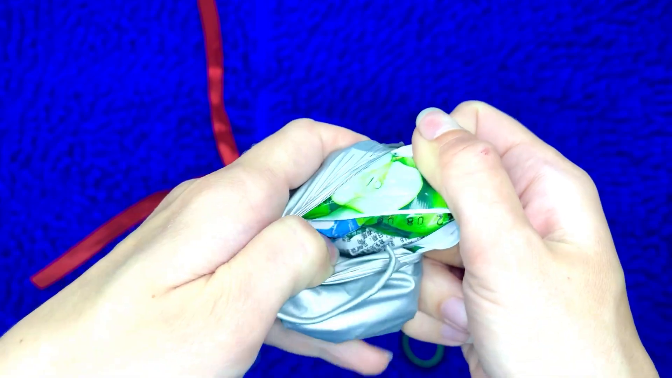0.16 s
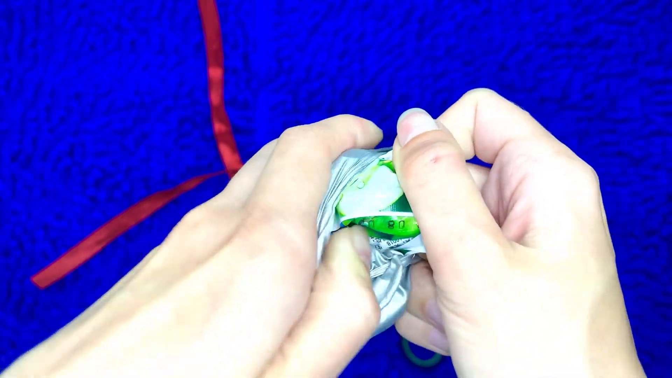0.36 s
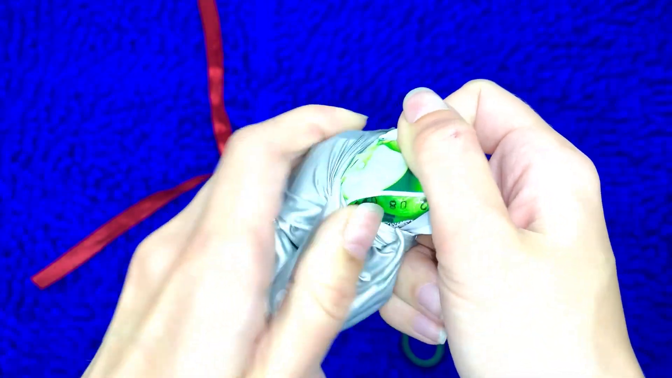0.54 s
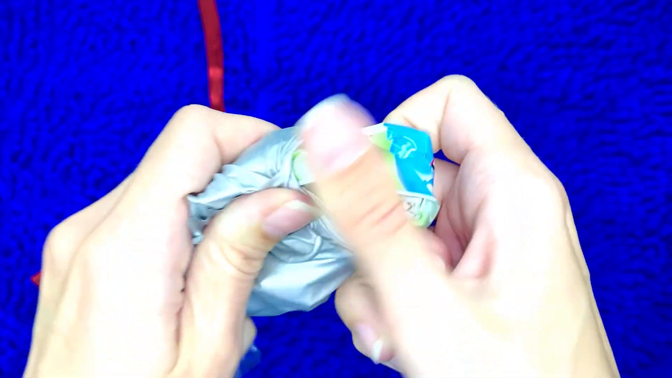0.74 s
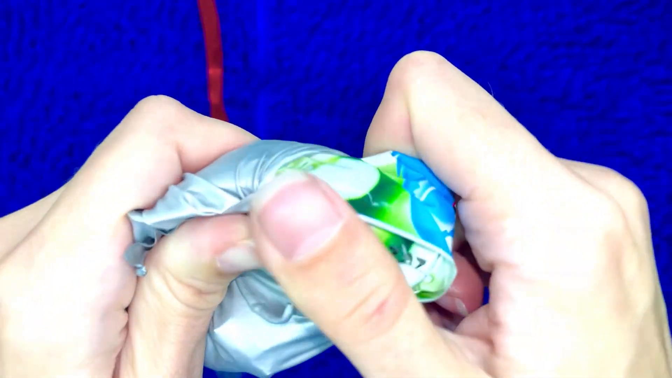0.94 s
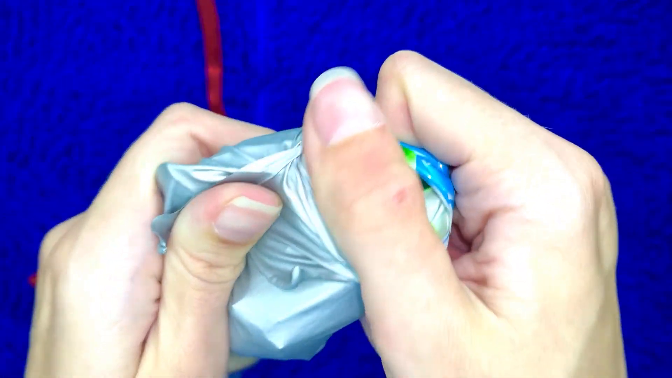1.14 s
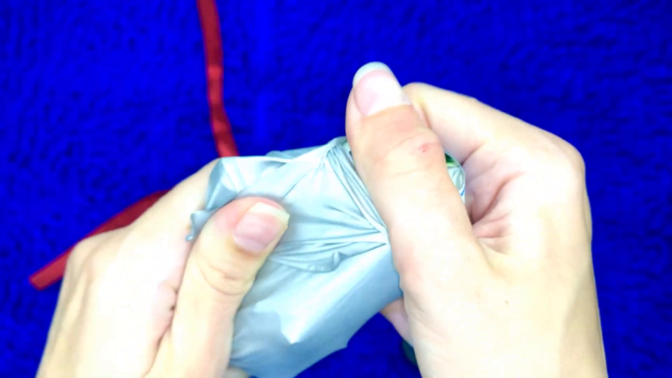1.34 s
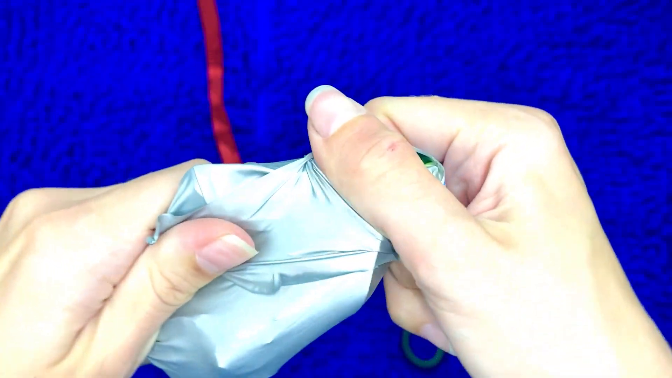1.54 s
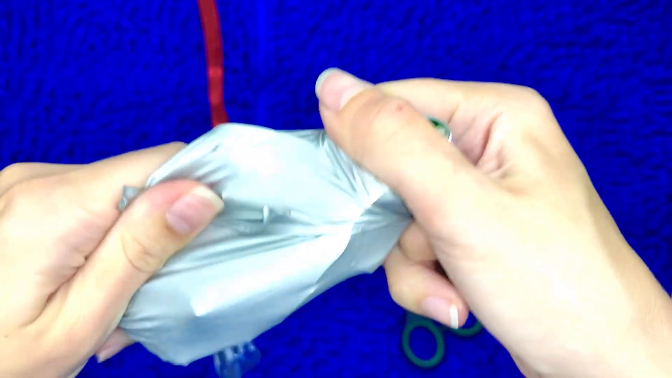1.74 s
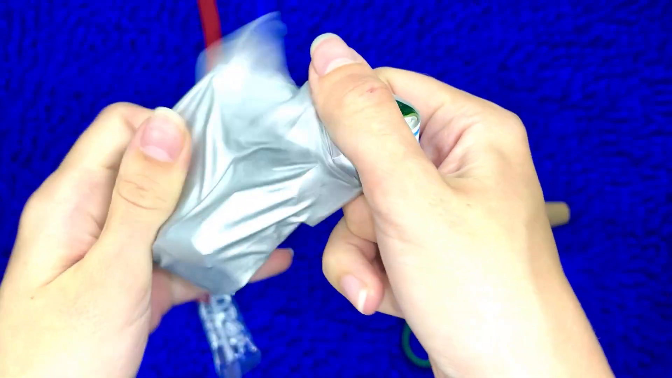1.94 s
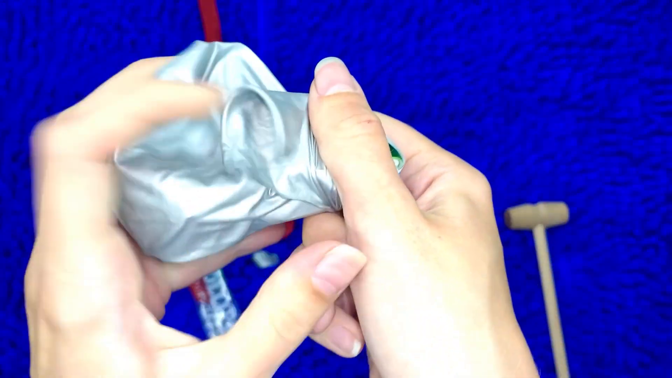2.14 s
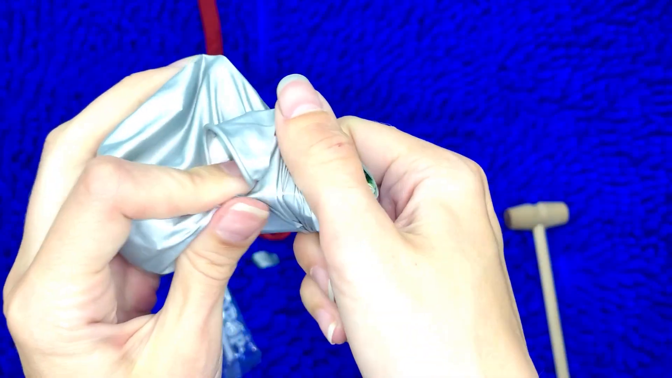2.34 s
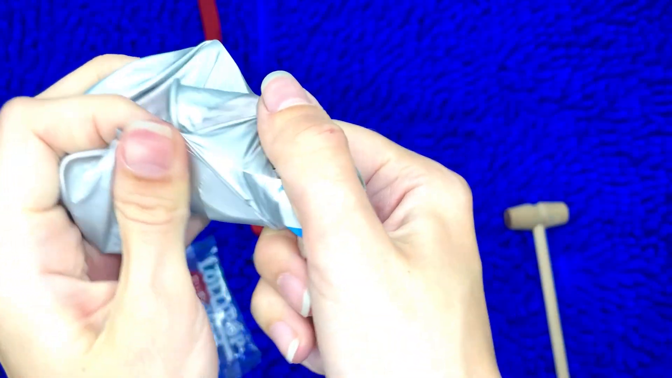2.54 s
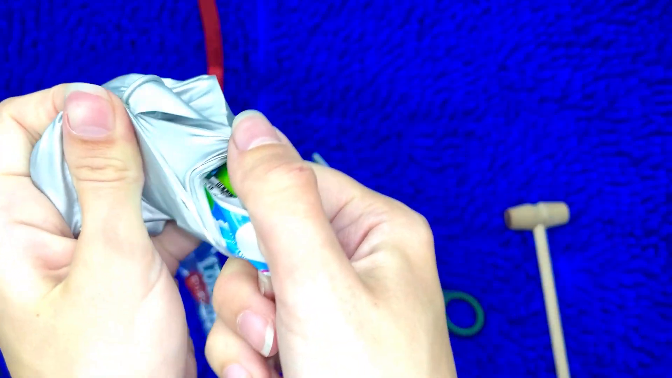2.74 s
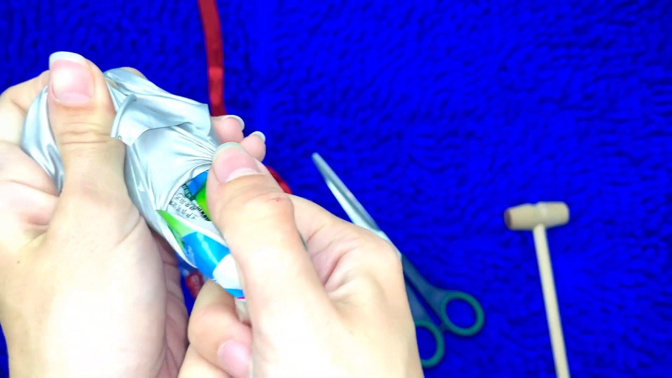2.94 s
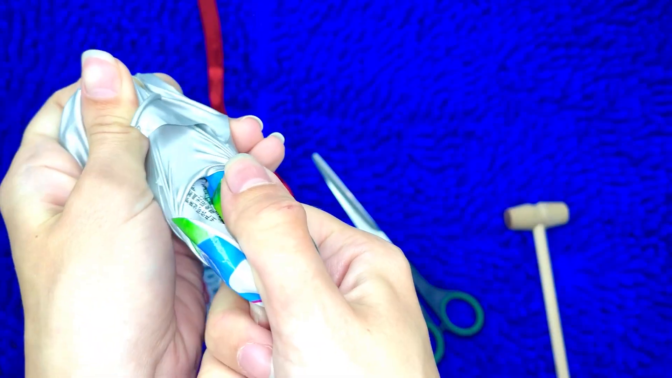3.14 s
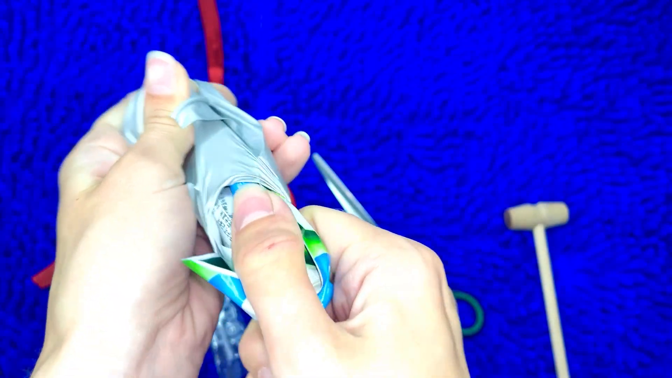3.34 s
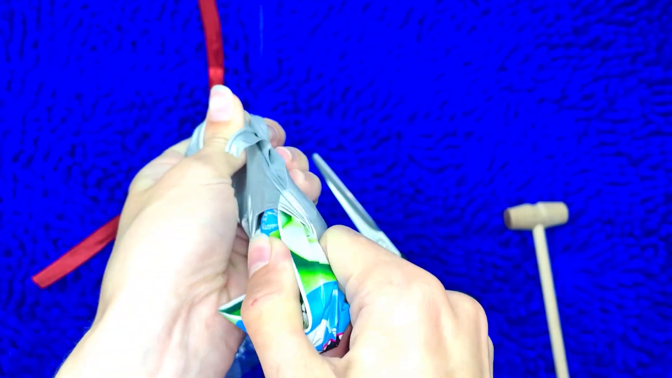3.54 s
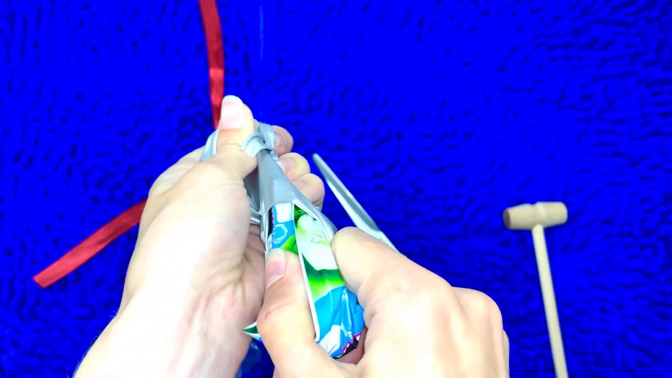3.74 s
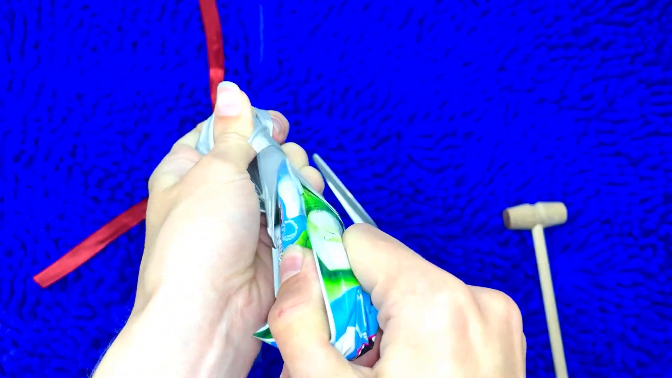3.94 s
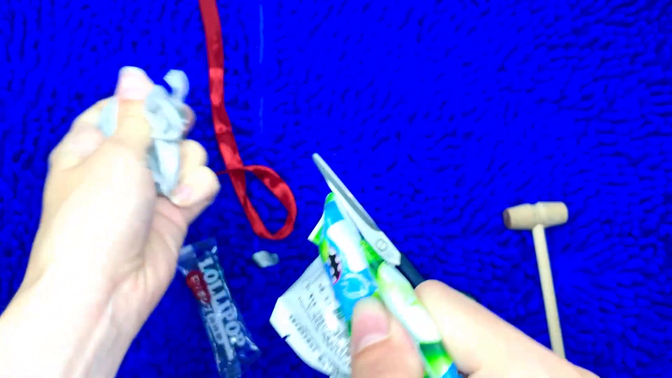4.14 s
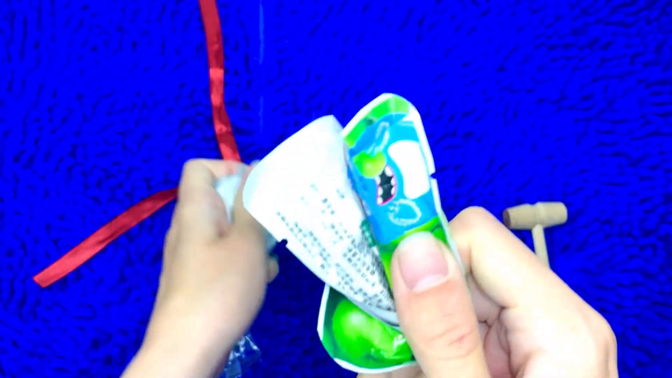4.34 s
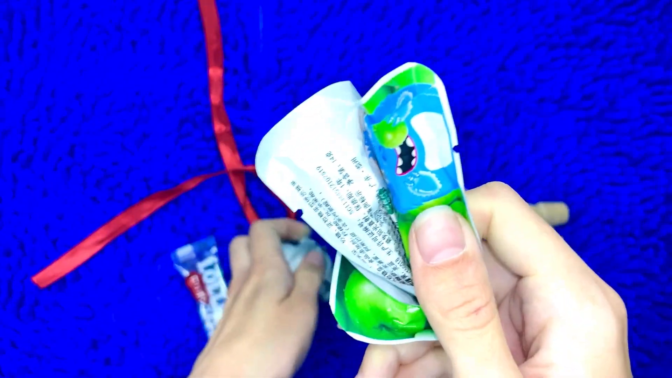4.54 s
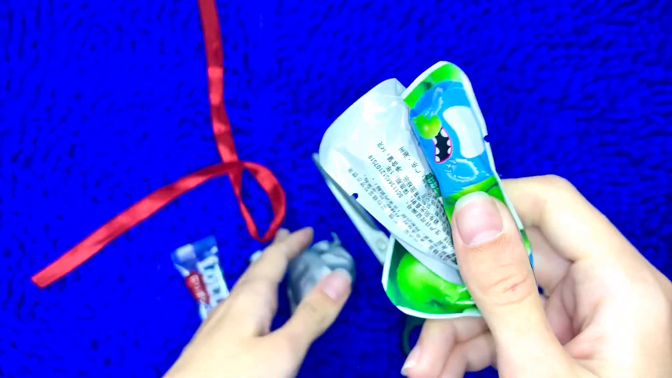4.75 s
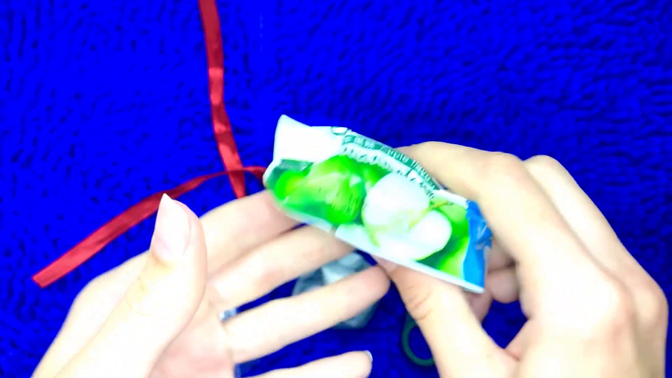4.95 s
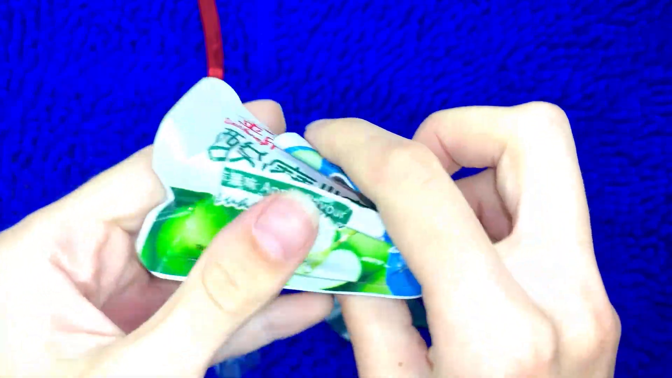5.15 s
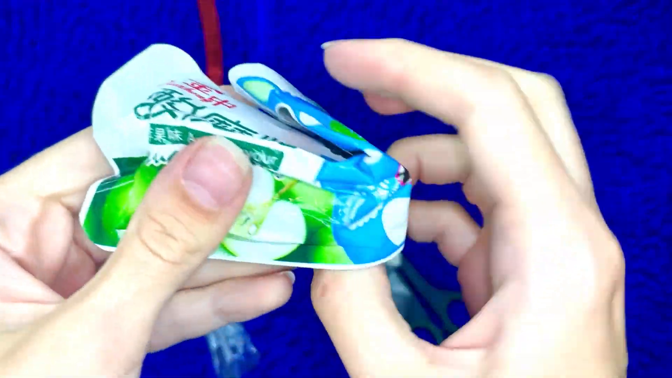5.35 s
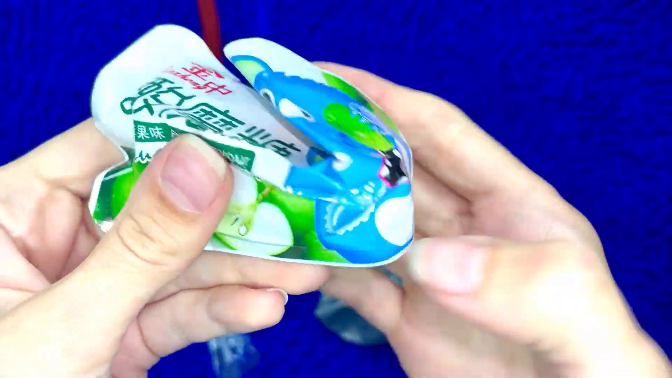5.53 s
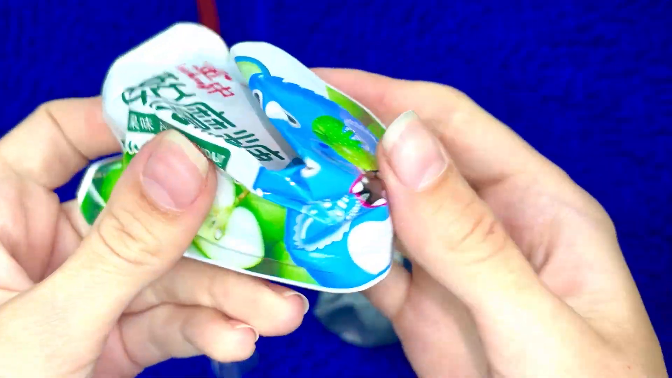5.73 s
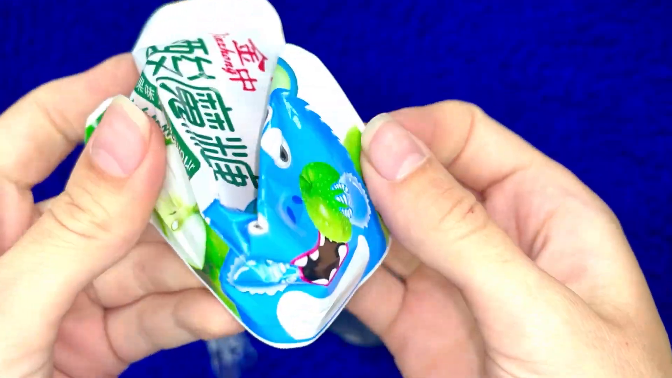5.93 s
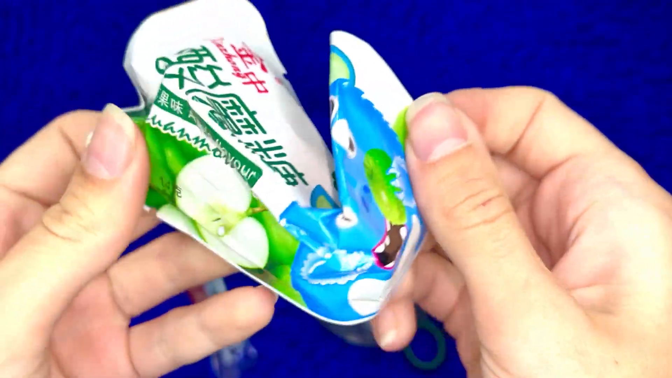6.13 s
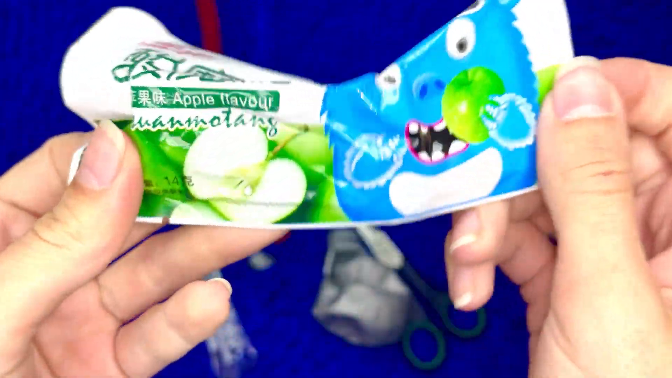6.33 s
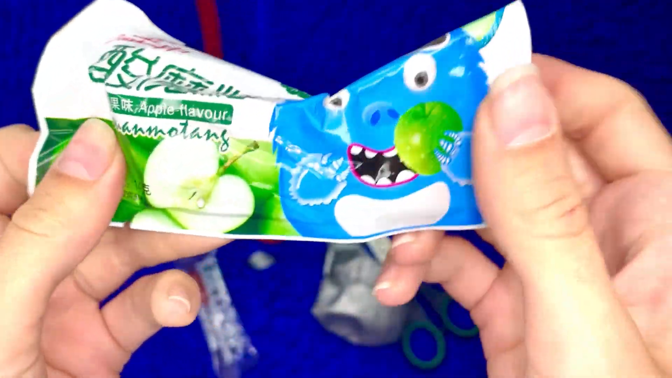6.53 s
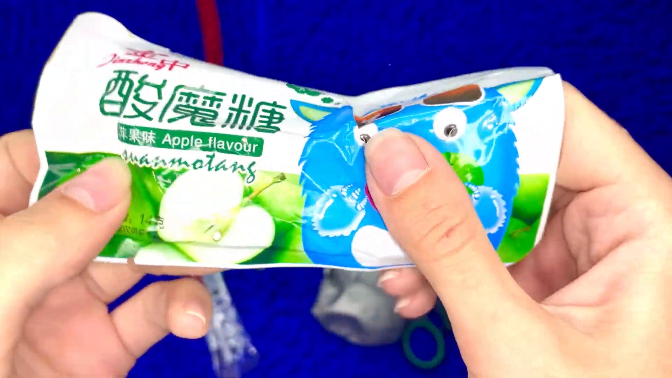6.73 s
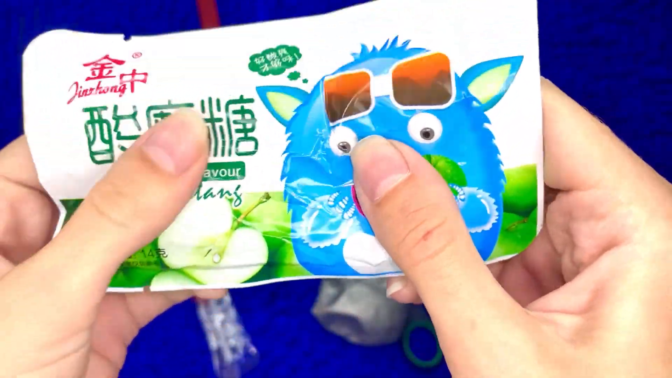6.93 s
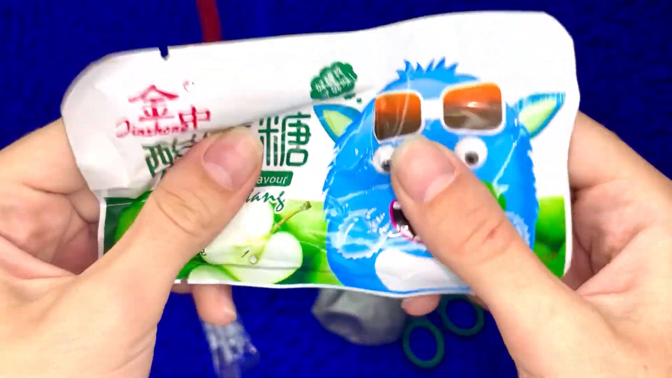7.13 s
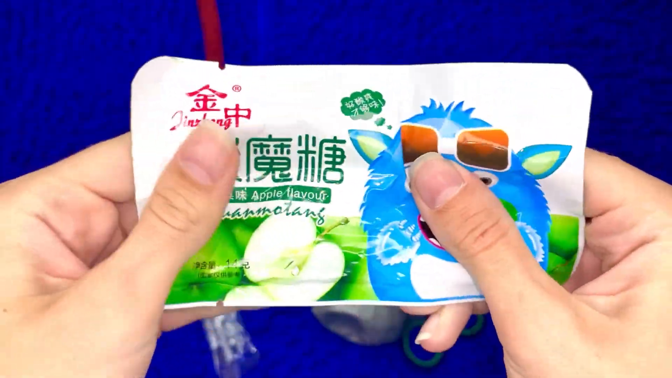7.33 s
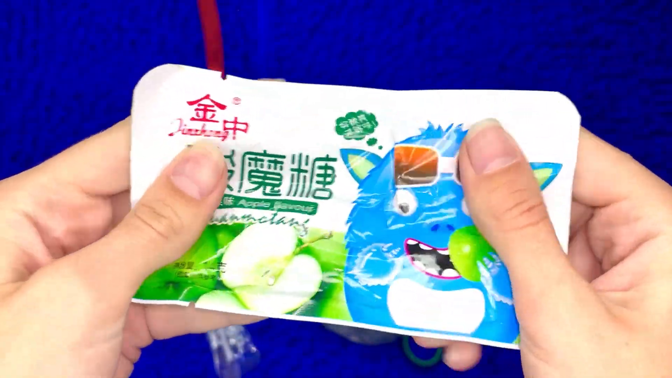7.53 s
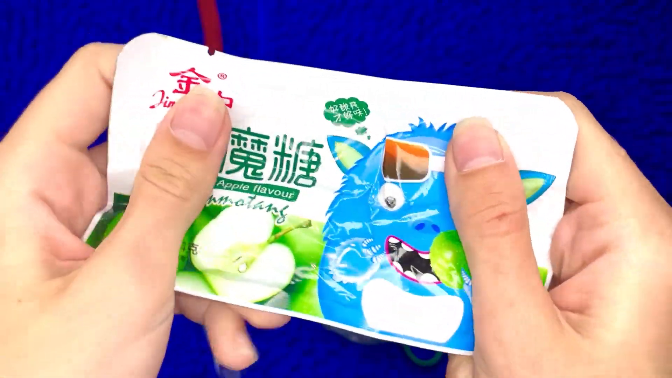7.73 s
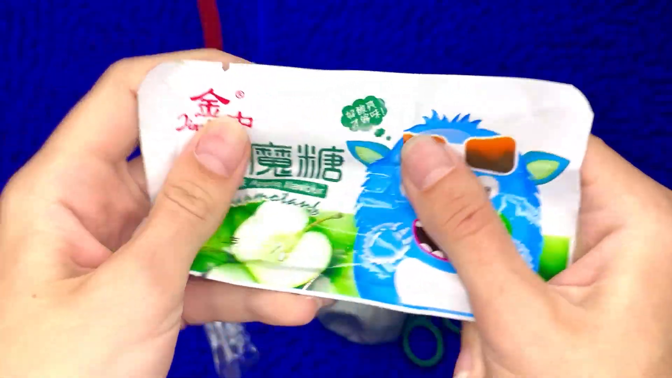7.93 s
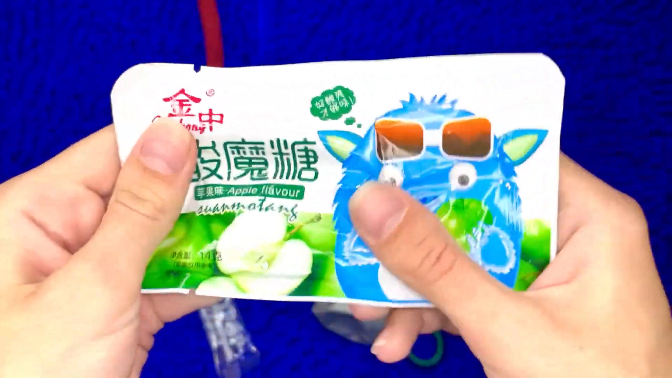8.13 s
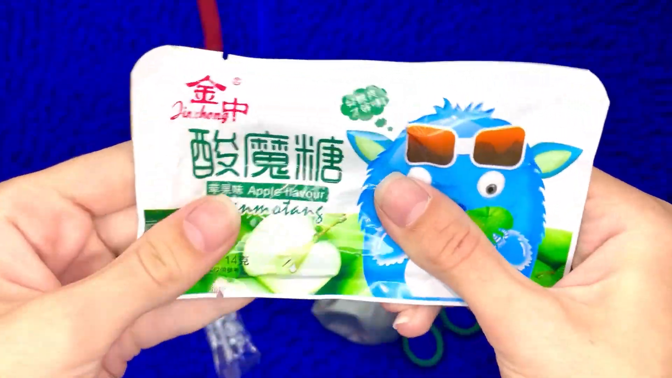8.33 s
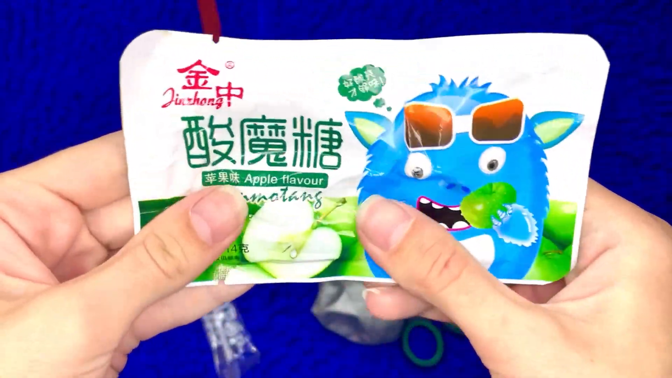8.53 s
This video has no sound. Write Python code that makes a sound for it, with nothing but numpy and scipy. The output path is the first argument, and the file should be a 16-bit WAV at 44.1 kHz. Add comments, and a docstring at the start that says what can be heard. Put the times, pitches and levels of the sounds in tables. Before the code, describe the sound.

Close, crisp wrapper crinkling: soft rustles and separate snaps, a brief lull, then busy bright crackling over a faint low motor hum.

```python
"""Foil wrap and sweet pouch, close up

Hands knead, pull apart and smooth out a foil wrap and a plastic pouch close to a two-port microphone.
Creases buckle as short noise snaps that spread through the film, highs first; small ticks and a skin rub
fill the gaps, and the pouch puffs low air. A quiet room adds steady air noise, a dull tail of echoes and
two standing waves; a motor hums faintly as two wavering tones."""
import sys
import numpy as np
from scipy import signal
from scipy.fft import rfft, irfft, next_fast_len
from scipy.io import wavfile
from scipy.ndimage import uniform_filter1d

SR = 44100
rng = np.random.default_rng(int(sys.argv[2]) if len(sys.argv) > 2 else 0)


def store_wav(level_fs):
    """Save 16-bit WAV to argv[1]."""
    pcm = np.round(np.clip(np.atleast_2d(level_fs), -1, 1) * 32767)
    wavfile.write(sys.argv[1], SR, pcm.T.astype(np.int16))


N = 382788


def from_db(db):
    """Gain of a dB value."""
    return 10 ** (np.asarray(db) / 20)


def rms_one(x, axis=None):
    """Scale to rms 1."""
    return x / np.sqrt(np.mean(x ** 2, axis=axis, keepdims=True) + 1e-20)


def at_hz(points, hz):
    """Read the second column of a table on a log-frequency axis."""
    table_hz, values = np.array(points).T
    return np.interp(np.log(hz), np.log(table_hz), values)


def drift(rate_hz):
    """Slow random wander of rms 1: noise through two equal low-pass poles, worked at every 40th sample."""
    pole = np.exp(-2 * np.pi * rate_hz * 40 / SR)
    noise = rng.standard_normal(N // 40 + 2002)
    slow = signal.lfilter([1], [1, -2 * pole, pole ** 2], noise)[2000:]   # skip the filter's start
    return np.interp(np.arange(N) / 40, np.arange(len(slow)), rms_one(slow))


# how alike the sound is at the two microphone ports: f/Hz, likeness/0-1
PORT_LIKENESS = [(100, .996), (700, .9), (1400, .99), (3300, .75), (5500, .95)]


def paired(mid, side, hz):
    """Two ports from a shared and an opposed part, as alike as the table says."""
    alike = np.clip(at_hz(PORT_LIKENESS, hz), 0, 1)
    shared = np.sqrt(1 + alike) * mid
    opposed = np.sqrt(1 - alike) * side
    return np.array([shared + opposed, shared - opposed])


def coloured(spectrum, size):
    """Steady two-port noise of a given colour; rms 1."""
    hz = np.maximum(np.fft.rfftfreq(size, 1 / SR), 1)
    mid, side = rfft(rng.standard_normal((2, size)))
    return rms_one(irfft(paired(mid, side, hz) * from_db(at_hz(spectrum, hz)), size))


# colour of the quiet room's air, relative: f/Hz, level/dB per Hz
AIR_COLOUR = [(20, -28), (60, -4), (125, 7.5), (230, -9), (600, -20.5), (6000, -19), (16000, -35)]


def room_air():
    """The quiet place itself: steady low-weighted noise at -58 dB rms."""
    return from_db(-58) * coloured(AIR_COLOUR, size=N)


# deep motor tone, mean rms level before its wander: t/s, level/dB
DEEP_TONE = [(0.6, -70), (2.8, -53), (3.8, -63.5), (4.6, -52), (5.8, -65)]
DEEP_HZ, HUM_HZ, HUM_PEAK_DB = 49, 162.9, -50


def motor_hum():
    """Two motor tones wavering in pitch and level: a steady one and a deep one that swells."""
    t = np.arange(N) / SR
    deep_rms_db = np.interp(t, *np.transpose(DEEP_TONE)) + 3.0 * drift(2.5)
    deep_phase = 2 * np.pi * np.cumsum(DEEP_HZ + 0.93 * drift(5.5)) / SR
    deep = from_db(deep_rms_db + 3) * np.sin(deep_phase)   # a sine peaks 3 dB above its rms
    hum_phase = 2 * np.pi * np.cumsum(HUM_HZ + 0.78 * drift(1.47)) / SR
    return deep + from_db(HUM_PEAK_DB + 2.0 * drift(4.7)) * np.sin(hum_phase)


# standing waves of the room, level against the start of the echoes: f/Hz, level/dB, t60/s
STANDING_WAVES = [(120.8, -7, 0.63), (393.4, -10, 0.69)]
ROOM_T60_S, ROOM_DB = 0.26, -18


def room(x):
    """A dull tail of dense echoes and two standing waves that ring on."""
    t = np.arange(SR // 2) / SR
    echoes = coloured([(1200, -1.0), (16000, -12)], size=len(t)) * from_db(-60 * t / ROOM_T60_S)
    tail = echoes * (t > 0.003)
    for hz, db, t60 in STANDING_WAVES:
        tail = tail + from_db(db - 60 * t / t60) * np.sin(2 * np.pi * hz * t)
    tail = tail / np.sqrt((tail ** 2).sum() / 2)   # unit energy per port, on average
    mono = x.mean(axis=0, keepdims=True)
    return from_db(ROOM_DB) * signal.oaconvolve(mono, tail, axes=1)[:, :N]


# the pouch puffs air when it pops open or flexes: t/s, level/dB (push)
AIR_PUFFS = [(3.969, -22.5), (6.349, -23), (6.444, -25.5), (6.956, -27)]


def puffs():
    """Soft low pushes of air, one out-and-back swing each, the same at both ports."""
    s, push_db = np.transpose(AIR_PUFFS)
    pushes = np.bincount(np.round(s * SR).astype(int), from_db(push_db), N)
    t = np.arange(SR // 20) / SR / 0.00092   # in units of 0.92 ms
    swing = t * (2 - t) * np.exp(-t) * 2
    return signal.oaconvolve(pushes, swing)[:N]


# each squeeze, pull or stroke of the hands: t/s (greatest force), level/dB (effort), length/s
HAND_SQUEEZES = [(0.286, -42.5, 0.16), (0.714, -42, 0.35), (1.283, -42.5, 0.48), (1.652, -32, 0.055),
                 (1.928, -34, 0.067), (2.414, -37.5, 0.048), (2.68, -40, 0.1), (2.839, -34.5, 0.041),
                 (3.678, -40.5, 0.16), (4.028, -46, 0.31), (4.413, -47.5, 0.24), (5.252, -43, 0.089),
                 (5.502, -40.5, 0.17), (6.032, -38.5, 0.059), (6.387, -33, 0.068), (6.705, -34.5, 0.061),
                 (6.971, -30.5, 0.085), (7.216, -31, 0.16), (7.578, -39, 0.4), (7.922, -29, 0.1),
                 (8.169, -31.5, 0.11), (8.398, -37, 0.3)]
# effort while the film is merely held: t/s, level/dB
RESTING_GRIP = [(0, -59), (2.1, -49.5), (3.2, -56), (4.5, -69), (6.25, -64), (8.68, -46)]
# the force falls this far one length after its peak; it builds in this share of that time
SQUEEZE_DROP_DB, RISE_SHARE = 12, 0.99


def handling(t):
    """How hard the hands work the film, in dB: every squeeze builds and eases over the resting grip."""
    power = from_db(np.interp(t, *np.transpose(RESTING_GRIP))) ** 2
    for s, db, length in HAND_SQUEEZES:
        away = np.maximum((t - s) / length, (s - t) / (length * RISE_SHARE))
        power = power + from_db(db - SQUEEZE_DROP_DB * away) ** 2
    return 10 * np.log10(power)


# colour of skin on the film, relative: f/Hz, level/dB per Hz
RUB_COLOUR = [(300, 8.5), (2400, 1), (5500, -6), (16000, -27.5)]
# a fingertip or the wrap slides quickly over the film: t/s (start), length/s, level/dB
QUICK_SLIDES = [(2.584, 0.044, -37.5), (5.503, 0.045, -36.5), (6.006, 0.021, -43)]
SLIDE_EDGE_S = 0.0042


def rub():
    """Fingers sliding on the film: a soft, unsteady hiss that follows the handling, and brighter quick slides."""
    t = np.arange(N) / SR
    effort_db = np.repeat(handling(np.arange(0, N, 32) / SR), 32)[:N]   # read every 32 samples
    hiss_db = 0.61 * effort_db - 27.5 + 7.6 * drift(9.8)
    slides = 0
    for s, length, db in QUICK_SLIDES:
        edges = np.minimum(t - s, s + length - t) / SLIDE_EDGE_S
        slides = slides + from_db(db) * np.clip(edges, 0, 1)
    return from_db(hiss_db) * coloured(RUB_COLOUR, size=N) + slides * coloured(FILM_COLOUR, size=N)


# colour of the film at either port, relative: f/Hz, level/dB per Hz
FILM_COLOUR = [(200, -8.5), (390, 0.5), (600, -3.5), (1000, 0.5), (1700, 0), (2600, 0.5), (3800, -3),
               (5500, 2), (8000, -4.5), (12500, -9.5), (17000, -21)]
EDGES = 180 * 2 ** np.arange(0, 7, 1 / 2.5)   # band edges in Hz, 2.5 bands per octave
RING_DB_PER_OCT = 6   # a crease falls off this fast either side of its pitch, out to 1.6 octaves


def buckles(s, peak_db, ring_hz, cycles, base_s, uneven_db, size):
    """Each buckle is a noise burst per band; low bands swell later and last longer, as bending waves do."""
    t = np.arange(size) / SR
    count = len(s)
    white = rng.standard_normal((count, 2, size))   # shared and opposed part
    uneven = rng.standard_normal((count, len(EDGES)))
    uneven = rms_one(uniform_filter1d(uneven, size=2))   # colour of each crease
    stretch = np.exp(0.49 * rng.standard_normal((count, 1, 1)))
    travel = rng.random((count, 1, 1))   # near creases sound at once, far ones spread out
    crack = 5.15 * rng.uniform(-0.75, 1, (count, 1, 1))   # the fold gives way in one sharp click
    settle = 0.95 * (1 - np.exp(-t / 0.0014)) * np.exp(-t / 0.0025)   # the film rattles on as it settles
    out = 0
    for k, (low, high) in enumerate(zip(EDGES, EDGES[1:])):
        hz = np.sqrt(low * high)
        tau = (base_s + travel * cycles / hz) * stretch
        swell = (t / tau * np.exp(1 - t / tau)) ** 2
        away = np.abs(np.log2(hz / ring_hz))   # octaves from the crease's pitch, where it rattles on most
        burst = white * (swell + settle * 2 ** -away[:, None, None])
        burst[:, :1, 16:17] += crack   # in the shared part only
        band_pass = signal.butter(2, [low, high], "band", fs=SR, output="sos")
        band = rms_one(signal.sosfilt(band_pass, burst), axis=2)
        ports = paired(band[:, 0], band[:, 1], hz)
        tilt_db = -RING_DB_PER_OCT * np.minimum(away, 1.6)
        gain = from_db(at_hz(FILM_COLOUR, hz) + tilt_db + uneven_db * uneven[:, k])
        # alternate signs keep neighbouring bands in step where they overlap
        out = out + (-1) ** k * gain[:, None] * np.sqrt(high - low) * ports
    out = out * (from_db(peak_db) / np.abs(out).max(axis=(0, 2)))[:, None]
    at = (np.round(s * SR).astype(int)[:, None] + np.arange(size)).ravel()
    return np.array([np.bincount(at, port.ravel(), N + size)[:N] for port in out])


CLUMPING = 0.22   # share of the handling's swing in dB that the tick rate follows


def ticks(count):
    """Small creases crowd where the hands work hardest, with no body in the bass; a few are far bigger."""
    draw = rng.random((count, 3))   # time, size, pitch
    t = np.linspace(0, N / SR, num=2000)
    share = np.cumsum(from_db(CLUMPING * handling(t)))
    s = np.interp(draw[:, 0], share / share[-1], t)
    size_db = -6.5 * np.log(draw[:, 1] + 0.1)
    peak_db = handling(s) + 7 + size_db
    ring_hz = 900 * 4.9 ** draw[:, 2]
    out = buckles(s, peak_db, ring_hz, cycles=0.073, base_s=0.00016, uneven_db=5, size=288)
    return signal.sosfilt(signal.butter(2, 450, "high", fs=SR, output="sos"), out)


# loud crease snaps, before the peaks are rounded: t/s, level/dB (peak), f/Hz (pitch the crease rings at)
CREASE_SNAPS = [(0.141, -13.5, 10800), (0.399, -18.5, 1500), (0.477, -18.5, 5700), (0.519, -19, 830),
                (0.562, -23.5, 2160), (0.722, -15.5, 1560), (0.748, -16, 1650), (0.758, -10.5, 2230),
                (0.804, -14, 5450), (0.875, -14.5, 5260), (0.89, -22, 1570), (0.946, -15.5, 9100),
                (0.973, -20, 2030), (0.992, -21, 2150), (1.026, -11, 5210), (1.058, -9, 1680),
                (1.201, -20.5, 2600), (1.227, -19.5, 5460), (1.289, -20.5, 2510), (1.323, -17.5, 5550),
                (1.416, -1.5, 1430), (1.426, -8, 2270), (1.493, -20, 1640), (1.626, -17, 2400),
                (1.636, -9.5, 1880), (1.688, -30, 2420), (1.868, -17.5, 2080), (1.896, -28, 1700),
                (1.973, -16.5, 1580), (2.287, -16.5, 2030), (2.302, -23, 2460), (2.358, -10, 1470),
                (2.423, -17.5, 2150), (2.559, -11.5, 1700), (2.659, -15, 2850), (2.752, -19, 1780),
                (2.82, -14, 2450), (2.833, -9.5, 1890), (3.161, -13, 4240), (3.327, -24.5, 1410),
                (3.454, -24, 1970), (3.499, -25.5, 2150), (3.518, -14, 5430), (3.542, -23.5, 2250),
                (3.59, -16, 5280), (3.632, -17.5, 1980), (3.653, -15.5, 2200), (3.684, -7.5, 2360),
                (3.719, -8, 5200), (3.747, -17, 2320), (3.784, -19, 5470), (3.843, -21.5, 2530),
                (3.963, -11.5, 2260), (3.973, 5, 2840), (3.976, -3, 931), (4.158, -19.5, 2640),
                (4.245, -27.5, 2250), (4.37, -26, 5640), (4.414, -19.5, 1700), (4.426, -19, 1290),
                (4.515, -29, 2510), (4.608, -17.5, 1320), (4.823, -34.5, 2600), (5.177, -30, 2640),
                (5.227, -23, 2400), (5.293, -14, 5000), (5.346, -14.5, 5000), (5.493, -13, 4920),
                (5.572, -6, 1350), (5.689, -26.5, 910), (5.808, -18, 1210), (5.834, -28, 1890),
                (5.849, -23.5, 1290), (5.992, -26.5, 1230), (6.055, -20.5, 2410), (6.193, -16, 4830),
                (6.207, -11.5, 3200), (6.265, -20, 1310), (6.302, -12.5, 1310), (6.323, -13.5, 4720),
                (6.347, 0, 5680), (6.362, -5, 2300), (6.379, -6.5, 5230), (6.446, -3, 2570),
                (6.548, -16.5, 2460), (6.693, -8.5, 1530), (6.737, -17.5, 2000), (6.752, -4.5, 5450),
                (6.797, -8, 5370), (6.809, -15, 1930), (6.851, -10.5, 2580), (6.892, -33, 1870),
                (6.917, -14.5, 1050), (6.938, -4.5, 5190), (6.963, -5, 1010), (7.019, -15, 2770),
                (7.035, -4, 5240), (7.061, -3, 1000), (7.193, -9.5, 960), (7.216, -2, 5600),
                (7.241, -6.5, 1500), (7.25, -4, 5760), (7.26, -10.5, 1910), (7.279, -10, 1910),
                (7.307, -7.5, 1000), (7.322, -5.5, 2490), (7.388, -14, 929), (7.515, -13.5, 770),
                (7.552, -7.5, 2180), (7.57, -13, 1020), (7.608, -11, 3670), (7.64, -11, 1020),
                (7.696, -9, 1530), (7.765, -19.5, 990), (7.791, -5.5, 1030), (7.805, -4, 1570),
                (7.85, -11, 5000), (7.891, -12, 2490), (7.904, -5.5, 1570), (7.933, -4, 960),
                (7.945, -3, 2270), (8.01, -12.5, 1540), (8.065, -12.5, 1540), (8.143, -11.5, 820),
                (8.2, -14.5, 2220), (8.211, -6, 1890), (8.24, -5, 4200), (8.349, -4, 2250),
                (8.45, -11, 1470), (8.507, -21, 1530), (8.538, -8, 5500), (8.611, -15.5, 3260)]


def snaps():
    """The loud creases: the film buckles in longer bursts, each round its own pitch."""
    s, peak_db, ring_hz = np.transpose(CREASE_SNAPS)
    return buckles(s, peak_db, ring_hz, cycles=0.15, base_s=0.00034, uneven_db=2.5, size=768)


def scene():
    """Film close to the microphone, with its room echo, rubbing hands, room air and motor."""
    film = snaps() + ticks(count=1100) + puffs()
    return film + room(film) + rub() + room_air() + motor_hum()


# level of the left port over the right: f/Hz, level/dB
PORT_BALANCE = [(300, .4), (750, 1.3), (1800, 0), (3300, -2.8), (5400, .4)]
# phase lead of the left port, straight lines in Hz: f/Hz, lead/rad
LEFT_LEAD = [(300, 0), (780, -.35), (1800, 0), (2900, .7), (4500, 1.0), (5000, -.1), (7640, np.pi),
             (14100, 3 * np.pi), (17000, 11.5)]
PEAK_LIMIT, CUTOFF_HZ = 0.68, 17000   # full scale is 1


def record(dry):
    """The microphone's ports differ in level and phase by frequency; peaks are rounded, both ends are cut."""
    size = next_fast_len(N + 4096)
    hz = np.maximum(np.fft.rfftfreq(size, 1 / SR), 1)
    lead = np.interp(hz, *np.transpose(LEFT_LEAD))
    # half of each difference goes to the left port, the opposite half to the right
    half = from_db(at_hz(PORT_BALANCE, hz) / 2) * np.exp(1j * lead / 2)
    ports = irfft(rfft(dry, size) * [half, 1 / half], size)[:, :N]
    ports = PEAK_LIMIT * np.tanh(ports / PEAK_LIMIT)
    ports = signal.sosfilt(signal.butter(2, 40, "high", fs=SR, output="sos"), ports)
    return signal.sosfilt(signal.ellip(12, 0.5, 90, CUTOFF_HZ, fs=SR, output="sos"), ports)


dry = scene()
out = record(dry)
store_wav(out)
```